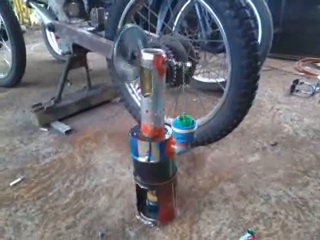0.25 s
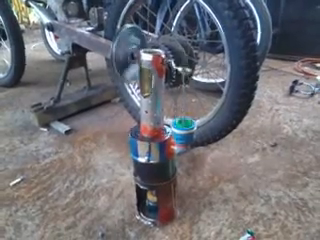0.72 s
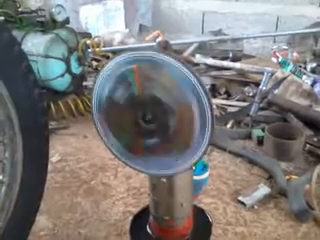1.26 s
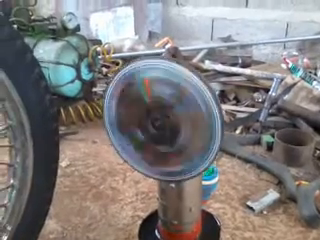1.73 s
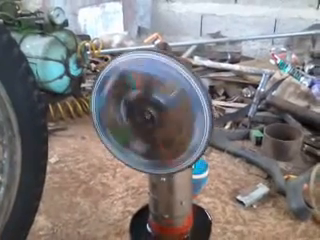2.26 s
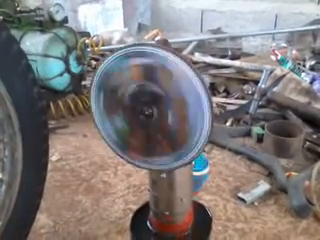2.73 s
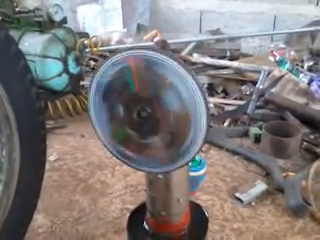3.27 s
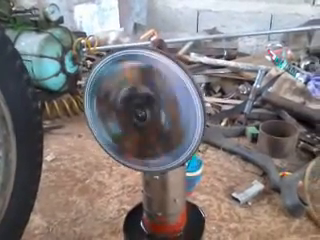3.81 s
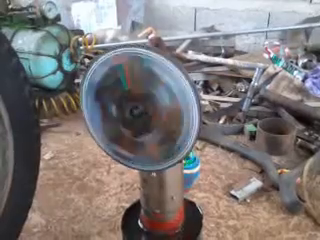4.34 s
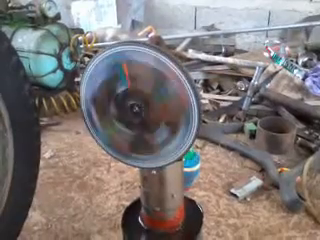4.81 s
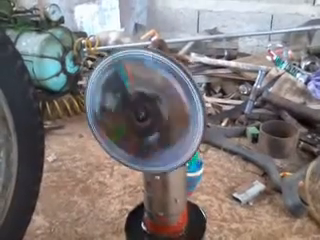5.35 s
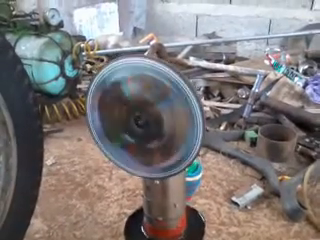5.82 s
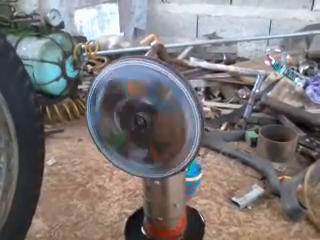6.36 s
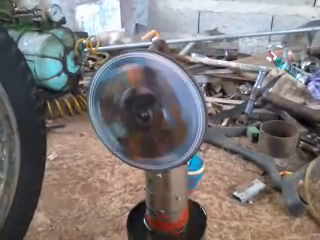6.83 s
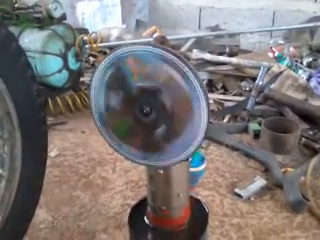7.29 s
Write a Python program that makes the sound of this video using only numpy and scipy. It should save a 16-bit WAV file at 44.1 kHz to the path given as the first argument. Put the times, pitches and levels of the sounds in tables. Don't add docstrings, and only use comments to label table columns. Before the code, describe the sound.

A small homemade engine of tin cans runs quickly and evenly in a cluttered open workshop, each turn a knock, clack and thin ping followed by a softer rubbing tick and thump. It starts slightly distant with two faint bird chirps, then jumps closer just before one second. Crickets shrill thinly, a bush cricket scrapes in bursts and birds chirp later. The handheld microphone sounds thin, with little bass.

```python
import sys
import numpy as np
from scipy import signal
from scipy.fft import rfft, irfft
from scipy.io import wavfile
from scipy.ndimage import uniform_filter1d

SR = 44100
rng = np.random.default_rng(int(sys.argv[2]) if len(sys.argv) > 2 else 0)


def int16_out(signal):
    q = np.round(np.clip(np.atleast_2d(signal).T, -1, 1) * 32767)
    wavfile.write(sys.argv[1], SR, q.astype(np.int16))


def rack_gain(trim_db):
    fader = np.asarray(trim_db, float)
    return 10 ** (fader / 20)


N = 333837


# (time of knock [s],
# clack level [dB], ping level [dB], tick level [dB])
CRANK_TURNS = [(1.0147, -16.5, -18.5, -29), (1.2307, -18, -16, -28), (1.4482, -18.5, -24.5, -23.5),
               (1.6654, -16.5, -19, -26.6), (1.8821, -17, -16, -27), (2.0985, -20.5, -14, -29.5),
               (2.3159, -17, -14, -26), (2.5337, -16, -15.5, -28.5), (2.7513, -17, -16, -42),
               (2.9671, -17.5, -18.5, -29), (3.1829, -18, -20, -25), (3.3978, -17, -19.2, -36),
               (3.6133, -17.5, -20.5, -31), (3.8289, -16.5, -16, -36), (4.0441, -16, -19.5, -33),
               (4.2581, -16.5, -15, -23.5), (4.4734, -17, -12.1, -37), (4.6863, -16, -15, -23.5),
               (4.9038, -20.8, -22.2, -34), (5.12, -19, -18, -29.5), (5.336, -18, -19, -32.8),
               (5.5529, -16.5, -26, -34), (5.7686, -16, -19, -36), (5.9844, -16.5, -21, -26.5),
               (6.202, -21.5, -18.5, -30), (6.4185, -21, -18, -38), (6.6355, -18, -16.5, -29),
               (6.8516, -19, -21, -31), (7.0682, -18, -17, -38), (7.285, -17.5, -24, -24),
               (0.0216, -23.5, -17, -46),
    (0.2421, -23, -27, -33),
    (0.4646, -20.6, -27, -33),
    (0.6865, -19, -28.5, -44),
    (7.5031, -23.5, -22.5, -40),
]
# (time [s], knock level [dB], return-stroke rub level [dB])
SLACK = [(0, -26, -45), (.7, -28, -46.5), (1.0, -20.5, -46), (1.45, -24, -46), (1.7, -23.5, -44.5),
         (2.3, -22.5, -43.5), (3.0, -23.5, -45), (3.6, -23.5, -44.5), (3.83, -24, -44.5), (4.3, -24.5, -44),
         (4.7, -22, -45), (5.34, -23.5, -44.5), (5.6, -23.5, -46), (6.5, -21, -47), (6.85, -25.5, -44.5),
         (7.3, -23, -44.5), (7.57, -27, -45.5)]


def turns():
    s, clack_db, ping_db, tick_db = np.transpose(sorted(CRANK_TURNS))
    knock_db, rub_db = curve(SLACK, s)
    return s, knock_db, clack_db, ping_db, tick_db, rub_db


# (frequency [Hz], level [dB], t60 [s])
KNOCK_MODES = [(680, -11.5, 0.06), (868, 5, 0.016), (1214, -5.5, 0.025), (1449, -3.5, 0.024),
               (1925, -1, 0.012), (2330, 10.5, 0.0049), (3180, -3.5, 0.012), (4130, 4.5, 0.0031),
               (5700, 5.5, 0.0039), (6900, -1, 0.0034)]
# (frequency [Hz], level [dB], t60 [s])
CLACK_MODES = [(776, -21, 0.0097), (750, -9.5, 0.019), (1413, 9.5, 0.0034), (2113, -8, 0.017),
               (2543, 0, 0.0075), (3420, -5, 0.0062), (4205, -0.5, 0.0035), (4503, 3, 0.0051),
               (5160, -1.5, 0.007), (5940, 4, 0.007), (6424, 1, 0.0087), (7600, 1.5, 0.0081)]
# (frequency [Hz], level [dB], t60 [s])
PING_MODES = [(780, -17, .025), (1350, -11, .009), (1900, -12, .009), (3050, -13, .009), (3950, -11, .009),
              (4650, -10, .011), (5800, -7, .01), (6550, 0, .011), (6850, 0, .01)]
# (frequency [Hz], level [dB], t60 [s])
TICK_MODES = [(1400, -20, .008), (3200, -16, .006), (4400, -12, .006), (5700, -2, .004), (6400, 0, .004),
              (7000, -4, .004)]
# (frequency [Hz], level [dB], t60 [s])
THUMP_MODES = [(724, -5.5, 0.016), (794, -6.5, 0.075), (1018, -5.5, 0.032), (1710, -2, 0.0097),
               (2830, -3, 0.0059)]
# (time [s], peak level [dB])
STRAY_TICKS = [(0.1314, -31.5), (0.1815, -32), (0.3525, -30), (0.5733, -28), (0.7673, -31), (.797, -37),
               (0.8144, -36), (0.8454, -36), (0.9027, -34), (0.9283, -31), (1.3381, -29.5), (2.8679, -30),
               (3.9741, -31), (4.5781, -24.5), (5.4831, -27), (6.5742, -25.5), (7.4341, -32)]
# (lag after knock [ms], scatter [ms], level over the rub [dB], scatter [dB])
SIDE_TICKS = [
    (105, 1.3, 6.5, 1),
    (111, 2, 6.5, 3.0),
]
# (lag after knock [ms], scatter [ms], level over the rub [dB], scatter [dB])
RETURN_THUMPS = [
    (106.5, 1.5, 4, 3.0),
    (119, 3.0, 3.5, 3.7),
    (131.3, 1.6, 10.5, 2.2),
    (147.4, 3.0, 7.7, 3.8),
]
# (time [s], peak level [dB])
SLAPS = [(.1544, -40), (.3807, -39), (.7673, -40), (.8125, -37), (.8256, -35), (.8459, -32), (.9027, -35),
         (2.0167, -31), (2.2326, -35), (2.2517, -31.5), (3.318, -41), (3.9742, -23), (4.1773, -34.5),
         (4.392, -34), (4.4028, -29), (4.6264, -34), (5.4828, -28.5), (4.8204, -41), (6.5513, -26.5),
         (6.7719, -38), (6.9854, -42)]


def blows():
    out = np.zeros(N)
    s, knock_db, clack_db, ping_db, tick_db, rub_db = turns()
    knock_lag_ms, clack_lag_ms, ping_lag_ms, tick_lag_ms = 1.302, 15.3, 42.3, 132.7
    knocks = zip(s + knock_lag_ms / 1000, knock_db)
    clacks = zip(s + clack_lag_ms / 1000, clack_db)
    pings = zip(s + ping_lag_ms / 1000, ping_db)
    ticks = list(zip(s + tick_lag_ms / 1000, tick_db)) + STRAY_TICKS + scattered(SIDE_TICKS)
    thumps = scattered(RETURN_THUMPS)
    add_contact(out, knocks, KNOCK_MODES, rise_ms=1.296, fall_ms=14.7, per_ms=3.0, fresh=0.52, trim_db=2.5)
    add_contact(out, clacks, CLACK_MODES, rise_ms=3.0, fall_ms=7.0, per_ms=7.0, fresh=0.7, trim_db=1.5)
    add_contact(out, pings, PING_MODES, rise_ms=3.7, fall_ms=1.55, per_ms=6.4, fresh=1.0, trim_db=1.0)
    add_contact(out, ticks, TICK_MODES, rise_ms=.7, fall_ms=.8, per_ms=5, fresh=.7, trim_db=0)
    add_contact(out, thumps, THUMP_MODES, rise_ms=1.6, fall_ms=4.5, per_ms=1.5, fresh=.8, trim_db=0.5)
    slap_modes = THUMP_MODES + KNOCK_MODES[2:7]
    add_contact(out, SLAPS, slap_modes, rise_ms=1.1, fall_ms=2.5, per_ms=2.5, fresh=.6, trim_db=1.2)
    return out


# (time [s], rub level [dB])
HIDDEN_TURN = (.798, -42.5)


def scattered(contacts):
    s, *_, rub_db = turns()
    s, rub_db = np.r_[s, HIDDEN_TURN[0]], np.r_[rub_db, HIDDEN_TURN[1] - 4]
    rows = []
    for lag_ms, scatter_ms, over_db, scatter_db in contacts:
        luck = rng.standard_normal((len(s), 2))
        times = s + (lag_ms + scatter_ms * luck[:, 0]) / 1000
        rows += zip(times, rub_db + over_db + scatter_db * luck[:, 1])
    return rows


# (time after knock [ms], level against the turn's rub [dB])
RUB = [
    (8, -29),
    (22, 6),
    (52, 2.5),
    (78, -15),
    (103, -17.5),
    (107, -5),
    (150, -3.5),
    (170, -17),
    (205, -12.5),
]
# (frequency [Hz], level [dB], t60 [s])
CAN_WALLS = [(635, -14, 0.072), (775, -14, 0.076), (1423, -8.5, 0.099), (2400, -12.5, 0.055)]


def rubbing():
    gain = np.zeros(N + SR)
    ms = np.arange(SR // 4) / SR * 1000
    one_turn = rack_gain(curve(RUB, ms, silent=-99)[0])
    for s, *_, rub_db in zip(*turns()):
        gain[int(s * SR):][:len(ms)] += rack_gain(rub_db) * one_turn
    hidden_s, hidden_db = HIDDEN_TURN
    gain[int(hidden_s * SR):][:len(ms)] += rack_gain(hidden_db) * one_turn * (ms > 60)
    hit = rng.random(N) < 1500 / SR
    grains = hit * rack_gain(4 * np.minimum(rng.exponential(1, N), 3)) * rng.choice([-1, 1], N)
    excite = gain[:N] * rms_one(grains) * rack_gain(3.5 * drift(50)) * rack_gain(2.0)
    low = ringing(KNOCK_MODES + THUMP_MODES + CAN_WALLS, 0.58, crack_db=-18.0)
    high = ringing(CLACK_MODES + TICK_MODES, 0.49, crack_db=-3.0)
    body = low / np.linalg.norm(low) + rack_gain(2) * high / np.linalg.norm(high)
    return signal.fftconvolve(excite, body)[:N]


# (frequency [Hz], level [dB], t60 [s])
THUD_MODES = [(217, -12.5, 0.12), (248.5, 24.5, 0.071)]


def thuds():
    out = np.zeros(N)
    s, *_, rub_db = turns()
    returns = zip(np.r_[s, HIDDEN_TURN[0]] + .131, np.r_[rub_db, -45])
    add_contact(out, returns, THUD_MODES, rise_ms=6.0, fall_ms=6.0, per_ms=8.0, fresh=.7, trim_db=-4)
    outward = zip(s + .034, rub_db)
    add_contact(out, outward, THUD_MODES, rise_ms=6.0, fall_ms=6.0, per_ms=8.0, fresh=.9, trim_db=-11)
    return signal.sosfilt(signal.butter(3, [150, 340], "band", fs=SR, output="sos"), out)


def add_contact(out, hits, modes, rise_ms, fall_ms, per_ms, fresh, trim_db):
    ms = np.arange(900) / SR * 1000
    shape = np.where(ms < rise_ms, (ms / rise_ms) ** 2, np.exp(-(ms - rise_ms) / fall_ms))
    give = np.minimum((np.arange(3000) + 3) / (rise_ms * SR / 3000), 1)
    for s, peak_db in hits:
        clicks = fresh * chatter(per_ms) * shape
        clicks[round(rise_ms * SR / 1500)] = 1
        sound = signal.fftconvolve(clicks, give * ringing(modes, 1.6, crack_db=2.5))
        sound *= rack_gain(peak_db + trim_db) / np.sqrt(uniform_filter1d(sound ** 2, size=60).max())
        start = max(round((s - rise_ms / 1000) * SR), 0)
        out[start:start + len(sound)] += sound[:max(N - start, 0)]


def chatter(per_ms):
    hit, size = rng.random((2, 900))
    return (hit < per_ms * 1000 / SR) * (2 * size - 1)


def ringing(modes, spread_db, crack_db):
    t = np.arange(3000) / SR
    hz, level_db, t60 = np.transpose(modes)[:, :, None]
    weight_luck, tune_luck = rng.standard_normal((2, len(modes), 1))
    decay = rack_gain(level_db + spread_db * weight_luck - 60 * t / t60)
    rings = decay * np.sin(2 * np.pi * hz * (1 + .015 * tune_luck) * t)
    return rings.sum(axis=0) + rack_gain(crack_db) * (t == 0)


# (time of first click [s], length [ms])
BUZZES = [(2.667, 15), (2.815, 15), (2.902, 15), (3.138, 15), (3.285, 15), (3.373, 19), (3.822, 10),
          (3.9615, 55), (4.026, 19), (4.105, 15), (4.146, 15), (4.325, 15), (5.176, 15), (5.225, 52),
          (5.2853, 47), (5.392, 15), (5.423, 33), (5.526, 15), (6.32, 15), (6.4865, 52), (6.5457, 52),
          (6.6065, 24), (6.691, 15), (6.744, 15), (6.786, 15)]
# (frequency [Hz], level [dB], t60 [s])
WING_MODE = [(6400, 0, .0028)]


def bush_cricket():
    period_ms = 4.64
    clicks = np.zeros(N)
    for first, length_ms in BUZZES:
        last = first + length_ms / 1000
        db = -37.5 + 0.0576 * length_ms
        at = (np.arange(first - .0015, last, period_ms / 1000) * SR).astype(int)
        clicks[at] = rack_gain(db + 16.0 + np.resize(rng.normal(0, 0.84, 16), len(at)))
    stroke = ringing(WING_MODE, 0, crack_db=-60)
    swell = np.minimum(np.arange(len(stroke)) / 18, 1) ** 2
    return signal.fftconvolve(clicks, stroke * swell)[:N]


# (time [s], level [dB])
CHORUS = [
    (.85, -48),
    (1.3, -48.5),
    (2.4, -50),
    (4.0, -50),
    (5.2, -49),
    (6.0, -50),
    (7.1, -47.5),
    (7.57, -48),
]
# (frequency [Hz], level [dB])
SINGERS = [(4930, -7), (4978, 8.5), (5025, 5.5), (5067, 9), (5112, -10.5)]


def crickets():
    t = np.arange(N) / SR
    chorus = np.zeros(N)
    for hz, db in SINGERS:
        phase = 2 * np.pi * np.cumsum(hz + 12 * drift(30)) / SR
        chorus += rack_gain(db + 3 * drift(28)) * np.sin(phase)
    return rack_gain(curve(CHORUS, t, silent=-99)[0] + 4.5) * rms_one(chorus)


# (start [s], length [s], first pitch [Hz], last pitch [Hz], top level [dB])
CHIRPS = [
    (.405, .08, 4000, 5000, -53),
    (.51, .04, 4250, 4450, -60),
    (5.385, .055, 3790, 3750, -58),
    (5.86, .09, 4050, 4850, -61),
    (6.34, .07, 3650, 3750, -57),
    (6.9, .06, 4620, 4780, -56),
    (7.428, .08, 4050, 3900, -55),
]


def birds():
    out = np.zeros(N)
    rough, waver_hz = rack_gain(5 * drift(120)), 70 * drift(200)
    for start, length, first_hz, last_hz, top_db in CHIRPS:
        span = slice(int(start * SR), int((start + length) * SR))
        done = np.linspace(0, 1, len(out[span]))
        hz = first_hz + (last_hz - first_hz) * done ** .7 + waver_hz[span]
        strength = rack_gain(top_db + 6 - 4.5 * (2 * done - 1) ** 2)
        out[span] += strength * rough[span] * np.sin(2 * np.pi * np.cumsum(hz) / SR)
    return out


# (frequency [Hz], density [dB per Hz])
YARD_SPECTRUM = [(25, -20), (60, -19), (100, -38), (160, -15), (250, -9), (500, -7), (640, 0), (800, 3),
                 (1000, -4), (1430, -6), (3000, -13), (5500, -13), (6900, -11), (8200, -32)]
# (time [s], level [dB], extra rumble [dB])
YARD_LEVEL = [
    (0, -46, -9),
    (.84, -48, -5),
    (.86, -47.5, 0),
    (7.57, -47.5, 2.5),
]


def yard():
    hz = np.maximum(np.arange(N // 2 + 1) * SR / N, 1)
    corner_hz, corner_db = np.transpose(YARD_SPECTRUM)
    noise = rfft(rng.standard_normal(N)) * rack_gain(np.interp(np.log(hz), np.log(corner_hz), corner_db))
    low = (hz > 120) & (hz < 600)
    level_db, rumble_db = curve(YARD_LEVEL, np.arange(N) / SR)
    hiss, rumble = irfft(noise * ~low, N), irfft(noise * low, N)
    return (hiss + rack_gain(rumble_db) * rumble) / np.std(hiss + rumble) * rack_gain(level_db + drift(1.1))


def shop(x):
    t = np.arange(SR // 2) / SR
    t60_s, tail_db = 0.3, -17.5
    tail = rng.standard_normal(len(t)) * rack_gain(-60 * t / t60_s) * np.minimum(t / .008, 1)
    return x + rack_gain(tail_db) * signal.fftconvolve(x, tail / np.linalg.norm(tail))[:N]


def microphone(x):
    steep = signal.sosfilt(signal.cheby1(7, 1, 605, "high", fs=SR, output="sos"), x)
    return steep + rack_gain(-14) * signal.sosfilt(signal.butter(2, [250, 600], "band", fs=SR, output="sos"), x)


def curve(rows, at, silent=None):
    first, *columns = np.transpose(rows)
    return [np.interp(at, first, c, left=silent, right=silent) for c in columns]


def rms_one(x):
    return x / np.sqrt(np.mean(x ** 2) + 1e-20)


def drift(rate_hz):
    r = np.exp(-2 * np.pi * rate_hz / SR)
    return rms_one(signal.lfilter([1], [1, -2 * r, r * r], rng.standard_normal(N + 9000))[9000:])


def scene():
    engine = microphone(shop(blows() + rubbing())) + thuds()
    return (engine + bush_cricket() + crickets() + shop(birds()) + yard())[None]


def top_cut(x):
    return signal.sosfilt(signal.butter(12, 9600, fs=SR, output="sos"), x)


def record(dry):
    edge = signal.sosfilt(signal.cheby1(13, 1, 7100, fs=SR, output="sos"), dry)
    leak = rack_gain(-25.5) * signal.sosfilt(signal.butter(4, [8450, 9150], "band", fs=SR, output="sos"), dry)
    mix = edge + leak - .0011
    return top_cut(mix)


dry = scene()
out = record(dry)
int16_out(out)
```